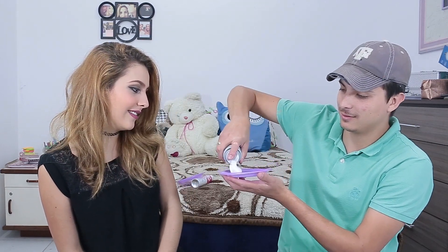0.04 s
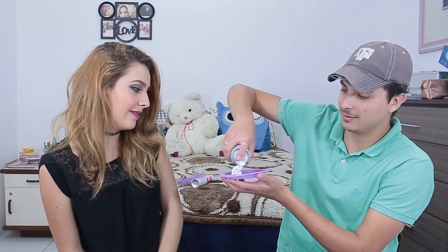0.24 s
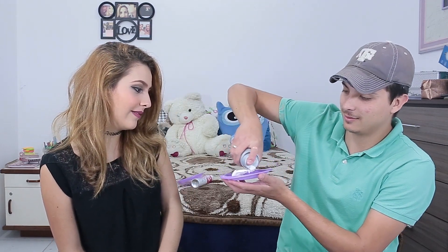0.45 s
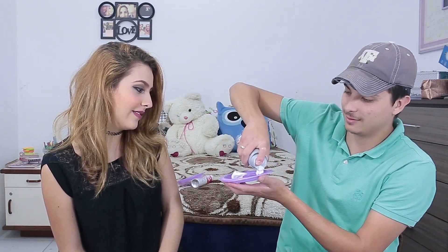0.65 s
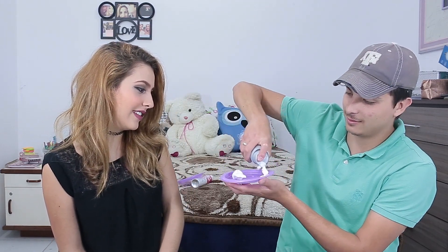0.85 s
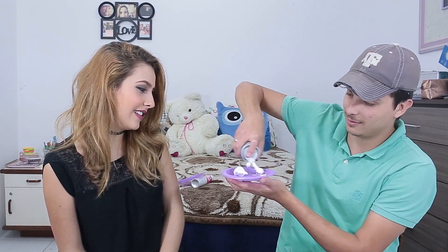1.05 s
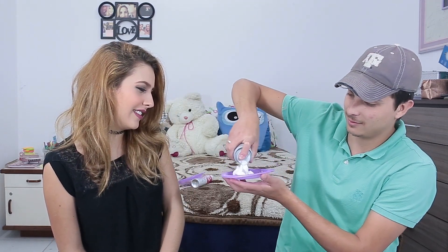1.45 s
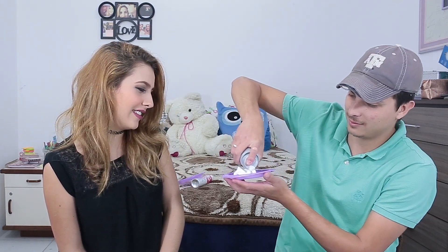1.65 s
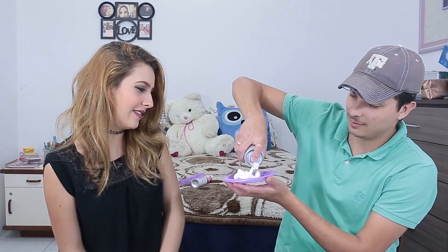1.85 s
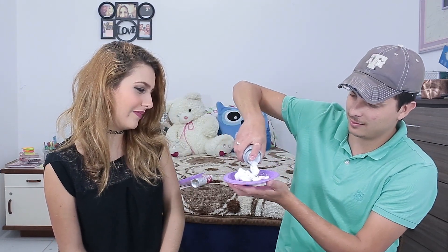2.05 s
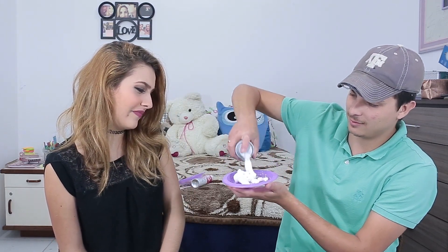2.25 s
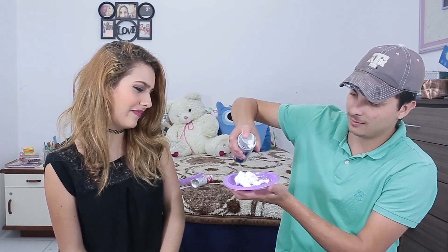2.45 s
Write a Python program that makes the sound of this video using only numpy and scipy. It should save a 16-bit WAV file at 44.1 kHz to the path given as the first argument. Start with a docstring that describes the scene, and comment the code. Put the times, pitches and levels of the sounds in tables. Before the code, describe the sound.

A can squirts foam onto a plate, heard from a little way off in a quiet room. After a click and some weak spits, the spray builds to a bubbly hiss, then stops, followed by another small click.

```python
"""First comes a faint hush: gas seeps from a pressurised can in a small, quiet, bare-walled room.
The nozzle clicks, and foam spits, dribbles, then sprays fully onto a plate. Gas hisses,
bubbles tear at the nozzle and the heap of foam gurgles. The flow sputters out and the
nozzle clicks back. One microphone listens from a little way off."""
import sys
import numpy as np
from scipy import signal
from scipy.fft import rfft, irfft
from scipy.io import wavfile

SR = 44100
rng = np.random.default_rng(int(sys.argv[2]) if len(sys.argv) > 2 else 0)


def waveform_to_disk(signal):
    """Save audio, clipped to [-1, 1], as 16-bit WAV at the path in sys.argv[1]."""
    frames = np.transpose(np.atleast_2d(signal))
    scaled = np.clip(frames, -1, 1) * 32767
    samples = np.round(scaled).astype(np.int16)
    wavfile.write(sys.argv[1], SR, samples)


N = 110250
T = np.arange(N) / SR
OPEN_S, CLOSE_S = 0.214, 2.231  # when the valve opens and shuts
FROTH_GRAIN, HISS_GRAIN = 0.6, 0.48  # 0 is a smooth rush, 1 is all crackle


def from_db(db):
    """Turn decibels into a gain to multiply by."""
    return 10 ** (np.asarray(db) / 20)


def rms_one(x):
    """Scale a sound so that its average strength (rms) is 1."""
    return x / np.sqrt(np.mean(x ** 2) + 1e-20)


def in_time(rows):
    """Join timed rows with straight lines, one curve for each value column."""
    times, *columns = np.transpose(rows)
    return [np.interp(T, times, column) for column in columns]


def at_hz(points, hz):
    """Read a table between its pitches, with octaves evenly spaced."""
    pitches, values = np.transpose(points)
    return np.interp(np.log(np.maximum(hz, 1)), np.log(pitches), values)


def coloured(x, spectrum):
    """Set the balance of low and high pitches, fading below the first row; rms 1."""
    hz = np.arange(N // 2 + 1) * SR / N
    bass_fade = np.minimum(hz / spectrum[0][0], 1) ** 2
    return rms_one(irfft(rfft(x) * from_db(at_hz(spectrum, hz)) * bass_fade, N))


def drift(rate_hz):
    """A smooth random wander; rms 1."""
    r = np.exp(-2 * np.pi * rate_hz / SR)
    return rms_one(signal.lfilter([1], [1, -2 * r, r * r], rng.standard_normal(2 * N))[N:])


def ring(x, hz, fade_s):
    """Each hit rings at one pitch and fades by 60 dB in fade_s."""
    r, w = np.exp(-np.log(1000) / (fade_s * SR)), 2 * np.pi * hz / SR
    return signal.lfilter([0, np.sin(w)], [1, -2 * r * np.cos(w), r * r], x + 1e-18)


def moving_resonance(x, hz, width_hz=1300, block=64):
    """Keep the sound near a gliding pitch with two filters in a row, each width_hz wide; rms 1."""
    out, state = np.zeros(N), np.zeros(4)
    r = np.exp(-np.pi * width_hz / SR)
    zeros = np.convolve([1, 0, -1], [1, 0, -1])
    for i in range(0, N, block):
        poles = [1, -2 * r * np.cos(2 * np.pi * hz[i] / SR), r * r]
        part = slice(i, i + block)
        out[part], state = signal.lfilter(zeros, np.convolve(poles, poles), x[part], zi=state)
    return rms_one(out)


def gas_seep():
    """Gas seeps faintly from the nozzle until the valve opens."""
    # tone of the seep: pitch_hz, relative_db
    tone = [(500, 2.5), (1200, -4.5), (2600, -4), (3500, -15), (5500, -19), (7000, -12.5), (9200, -9),
            (15500, -26)]
    return from_db(-53) * (T < OPEN_S) * coloured(rng.standard_normal(N), tone)


def room_noise():
    """The quiet room has a steady hush and a faint hum."""
    # tone of the hush: pitch_hz, relative_db
    tone = [(25, -12), (60, -12.5), (90, -18), (125, -13.5), (205, -11), (260, -2), (440, -0.5),
            (700, -12.5), (1700, -15.5), (3500, -23), (8000, -28), (15500, -34)]
    # notes of the hum: pitch_hz, level_db
    notes = [(120, -70.5), (176, -69.5)]
    hum = sum(from_db(db) * np.sqrt(2) * np.sin(2 * np.pi * (hz * T + rng.random())) for hz, db in notes)
    return from_db(-52) * coloured(rng.standard_normal(N), tone) + hum


def bursting(grain, bubbles_per_s=2500):
    """Tiny bubbles of uneven size burst in rushing gas; grain is their share of the power."""
    sizes_db = 4 * np.minimum(rng.exponential(1, N), 5)
    kicks = from_db(sizes_db) * rng.choice([-1, 1], N)
    crackle = rms_one(kicks * (rng.random(N) < bubbles_per_s / SR))
    return np.sqrt(grain) * crackle + np.sqrt(1 - grain) * rng.standard_normal(N)


def spray(attack_s=0.0024, release_s=0.014):
    """The open valve lets out gas and foam, with a slight flutter in loudness."""
    # how strongly each part of the flow sounds: time_s, gurgle_db, froth_db, hiss_db
    flow = [(.218, -42, -38, -48), (.235, -33.5, -38, -41), (.27, -39.5, -43, -49), (.31, -57, -42, -48),
            (.39, -46, -38, -43.5), (.445, -48, -36.5, -46.5), (.465, -44, -32, -41.5),
            (.56, -52, -33.5, -38.5), (.61, -42.5, -31, -44.5), (.67, -45.5, -38, -43.5),
            (.725, -42, -33, -40.5), (.795, -35.5, -26.5, -31), (.92, -38.5, -27, -29.5),
            (1.0, -43, -28, -29), (1.1, -43.5, -26.5, -27.5), (1.18, -56, -30.5, -25.5),
            (1.205, -36, -29.5, -30), (1.235, -30, -22.5, -28.5), (1.32, -35, -30, -29),
            (1.36, -26, -26, -28), (1.41, -40.5, -29, -29), (1.45, -30.5, -28.5, -28),
            (1.62, -33.5, -26.5, -30.5), (1.76, -41.5, -30, -32.5), (1.88, -41, -30.5, -32.5),
            (1.975, -32.5, -29.5, -33.5), (2.05, -33, -27, -32), (2.16, -31.5, -34, -30.5),
            (2.2, -45.5, -45, -46), (2.25, -30, -31, -56)]
    gurgle_db, froth_db, hiss_db = in_time(flow)
    opening = np.clip((T - OPEN_S) / attack_s, 0, 1)
    closing = np.exp(-np.maximum(T - CLOSE_S, 0) / release_s)
    jet = from_db(gurgle_db + 1) * gurgle()
    jet += from_db(froth_db - 1.5) * froth()
    jet += from_db(hiss_db + 2.5) * hiss()
    jet += gap_ring()
    flutter_db = 0.55 * drift(45)
    return opening * closing * from_db(flutter_db) * (jet + spits_and_whistles())


def gurgle():
    """The heap of foam bubbles with a low, slightly wavering sound."""
    # tone of the heap: pitch_hz, relative_db
    tone = [(190, -51), (265, -13.5), (400, -18), (510, -9.5), (620, -6.5), (780, -4), (930, -1.5),
            (1250, 1), (1700, -7), (3000, -34)]
    waver_db = 0.29 * drift(20)
    return from_db(waver_db) * coloured(bursting(FROTH_GRAIN), tone)


def froth():
    """Bubbles crackle as they tear at the nozzle."""
    # tone of the tearing bubbles: pitch_hz, relative_db
    tone = [(300, -36), (750, -10.5), (950, -8), (1300, -0.5), (2100, 2.5), (2550, -0.5), (2950, 0),
            (3500, -5), (4500, -19.5), (5400, -10.5), (9000, -26), (15000, -103)]
    return coloured(bursting(FROTH_GRAIN), tone)


def hiss(pops_per_s=30, pop_db=6):
    """Escaping gas hisses, and now and then a larger bubble bursts with a tick."""
    # tone of the gas: pitch_hz, relative_db
    tone = [(1500, -18), (3000, -5.5), (4500, 1.5), (5400, -4), (6600, 0), (8000, 0.5), (9500, 1),
            (10600, -2), (12600, -4.5), (14000, -11.5), (15700, -20)]
    gas = coloured(bursting(HISS_GRAIN), tone)
    pops = (rng.random(N) < pops_per_s / SR) * rng.standard_normal(N)
    return gas + from_db(pop_db) * pops


def gap_ring():
    """The gap between nozzle and foam rings hollowly, with a weak overtone about an octave up."""
    # ring of the gap: time_s, pitch_hz, level_db
    glide = [(.22, 3080, -35), (.33, 3180, -54), (.55, 3480, -38.5), (.7, 3440, -43.5), (.85, 3460, -33),
             (.98, 4400, -52), (1.06, 6600, -46), (1.135, 6340, -28), (1.235, 5450, -30.5),
             (1.255, 3800, -29), (1.42, 3360, -27.5), (1.62, 3840, -31), (1.8, 3650, -35),
             (1.93, 4200, -36), (2.06, 4450, -32.5), (2.16, 4480, -30), (2.21, 4430, -42)]
    hz, db = in_time(glide)
    overtone = moving_resonance(bursting(HISS_GRAIN), 1.975 * hz)
    main_note = moving_resonance(bursting(HISS_GRAIN), hz)
    return from_db(db) * (main_note + from_db(-16) * overtone)


def nozzle_clicks(snap_s=0.00066, treble_cut_hz=7700):
    """The plastic nozzle snaps and rings briefly as it is pressed and let go."""
    # the press and the release: start_s, ring_db, snap_db
    clicks = [(0.219, -31, -20.5), (2.4004, -31, -29)]
    # notes the plastic rings at: pitch_hz, relative_db, fade_s
    notes = [(1720, -3.5, 0.022), (2660, -12, 0.0035), (6100, -4.5, 0.0091)]
    hits, snap_level = np.zeros(N), 0
    for start_s, ring_db, snap_db in clicks:
        hits[int(start_s * SR)] = from_db(ring_db)
        snap_level += from_db(snap_db) * (T >= start_s) * np.exp(-np.abs(T - start_s) / snap_s)
    snap = signal.lfilter(*signal.butter(1, treble_cut_hz, fs=SR), snap_level * rng.standard_normal(N))
    return snap + sum(from_db(db) * ring(hits, hz, fade_s) for hz, db, fade_s in notes)


def spits_and_whistles():
    """Short swells of crackle: hollow spits of foam, bright surges of hiss and high nozzle whistles."""
    # hollow or whistling swells: peak_s, half_length_s, pitch_hz, filter_width_hz, level_db
    swells = [(0.242, 0.018, 2530, 1260, -31), (0.34, 0.095, 9460, 450, -54), (0.53, 0.098, 1324, 130, -38),
              (0.6, 0.062, 2090, 900, -43), (0.63, 0.053, 938, 70, -47), (1.016, 0.088, 9430, 300, -31.5),
              (1.127, 0.033, 2970, 300, -36), (1.134, 0.051, 12400, 3000, -29.5),
              (1.54, 0.2, 1185, 440, -35.5), (1.764, 0.079, 9460, 900, -35.5),
              (2.134, 0.068, 1960, 1080, -26.5), (2.219, 0.02, 2240, 1400, -30.5)]
    out = 0
    for peak_s, half_length_s, hz, width_hz, db in swells:
        b, a = signal.iirpeak(hz, hz / width_hz, fs=SR)
        crackle = signal.lfilter(b, a, signal.lfilter(b, a, bursting(FROTH_GRAIN)))
        swell = np.exp(-((T - peak_s) / half_length_s) ** 2)
        out += from_db(db) * swell * rms_one(crackle)
    return out


def reverb_tail(bands=8):
    """Echoes off the bare walls blur into a one-second tail whose treble dies first."""
    # time the room takes to fade by 60 dB: pitch_hz, fade_s
    fades = [(250, 0.64), (1500, 0.45), (4000, 0.4), (9000, 0.38), (15000, 0.3)]
    t, hz = T[:SR], np.arange(SR // 2 + 1)
    noise_spectrum, tail = rfft(rng.standard_normal(SR)), 0
    edges = np.geomspace(100, SR / 2, bands + 1)
    for low, high in zip(edges, edges[1:]):
        band = irfft(noise_spectrum * (hz >= low) * (hz < high), SR)
        fade_s = at_hz(fades, np.sqrt(low * high))
        tail += band * np.exp(-np.log(1000) * t / fade_s)
    return rms_one(tail * (t > .003)) / np.sqrt(SR)


def room(x, places=10, tail_db=-0.5, peak_width_hz=29.5):
    """The room adds close echoes, a tail that changes as the can moves, and favoured pitches."""
    # bounces off nearby surfaces: delay_ms, gain
    echoes = [(6.298, 0.13), (7.6, 0.16), (9.66, 0.19), (11.9, 0.3)]
    # pitches that the room favours: pitch_hz, boost_db
    peaks = [(510, 2.5), (932, 6), (1070, 0.5), (1242, 3), (1340, 1.5), (1522, 3.5), (1611, 5), (1953, 2.5),
             (2089, 2), (2175, 2), (2251, 3), (2950, 5)]
    out = x + sum(gain * np.interp(T - ms / 1000, T, x, left=0) for ms, gain in echoes)
    place = np.linspace(0, places - 1, N)
    for k in range(places):  # each place has its own tail, blending into the next
        nearness = np.sqrt(np.maximum(1 - np.abs(place - k), 0))
        out += from_db(tail_db) * signal.fftconvolve(x * nearness, reverb_tail())[:N]
    for hz, db in peaks:
        b, a = signal.iirpeak(hz, hz / peak_width_hz, fs=SR)
        out += (from_db(db) - 1) * signal.lfilter(b, a, out)
    power = 1 + from_db(tail_db) ** 2 + sum(gain ** 2 for _, gain in echoes)
    return out / np.sqrt(power)


def scene():
    """The can sprays in the quiet room, the same in both channels."""
    can = room(spray() + nozzle_clicks())
    return np.tile(can + gas_seep() + room_noise(), (2, 1))


def record(dry):
    """The very highest treble is cut off steeply."""
    cutoff_hz = 15750
    return signal.sosfilt(signal.ellip(12, .1, 90, cutoff_hz, fs=SR, output="sos"), dry)


dry = scene()
out = record(dry)
waveform_to_disk(out)
```